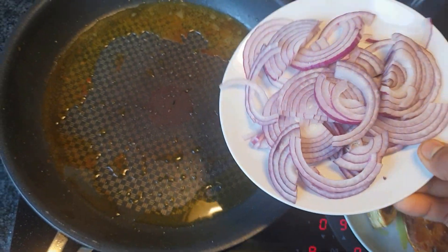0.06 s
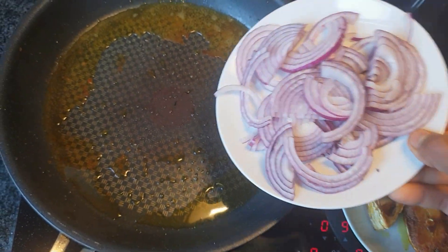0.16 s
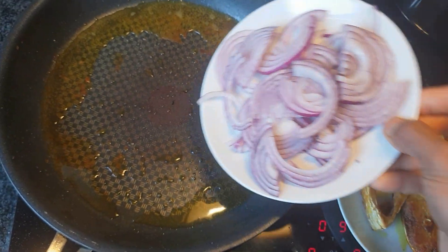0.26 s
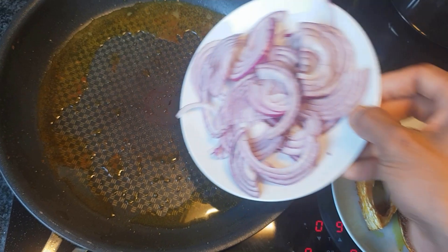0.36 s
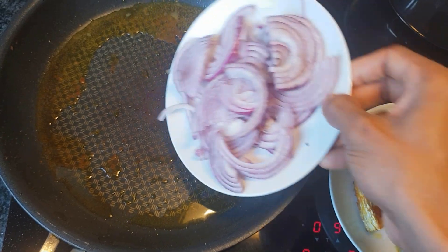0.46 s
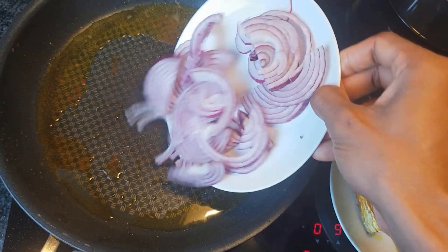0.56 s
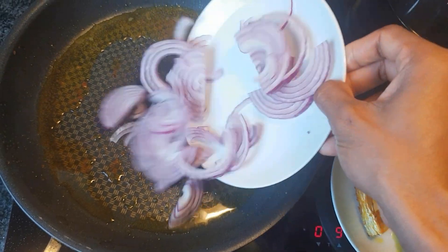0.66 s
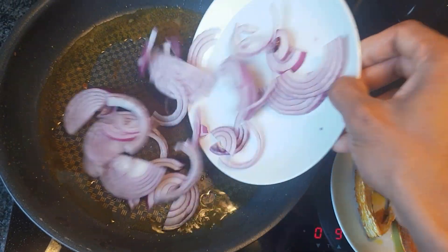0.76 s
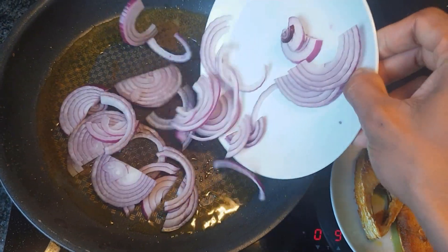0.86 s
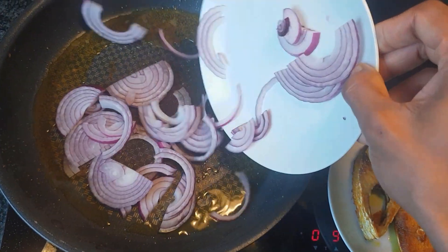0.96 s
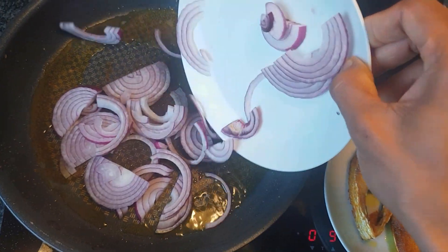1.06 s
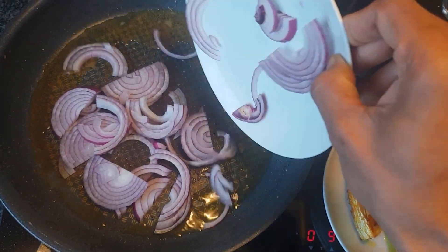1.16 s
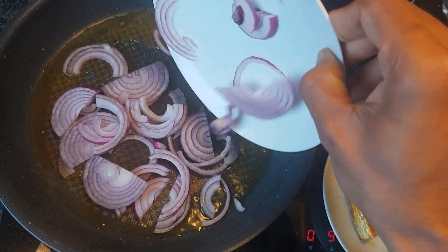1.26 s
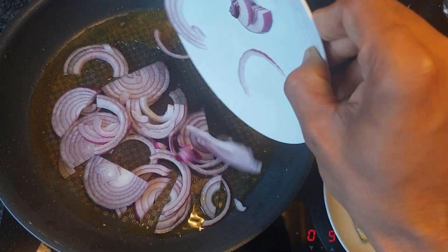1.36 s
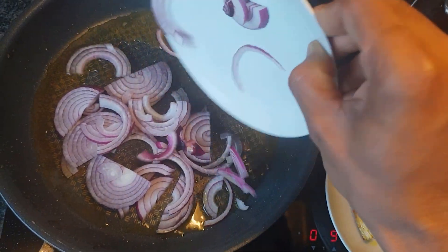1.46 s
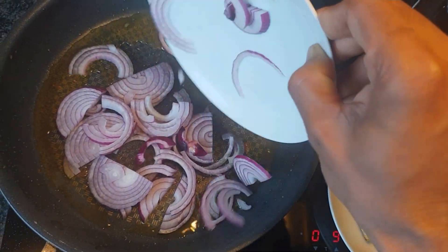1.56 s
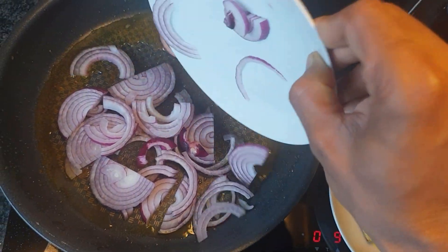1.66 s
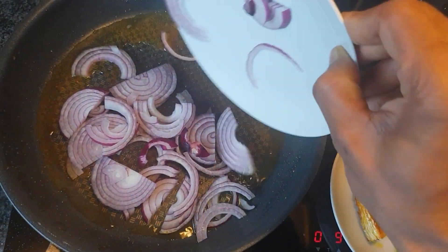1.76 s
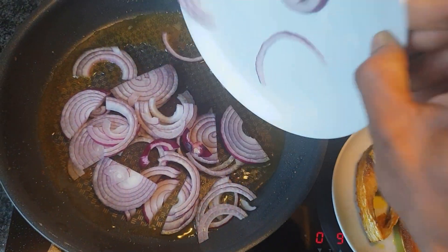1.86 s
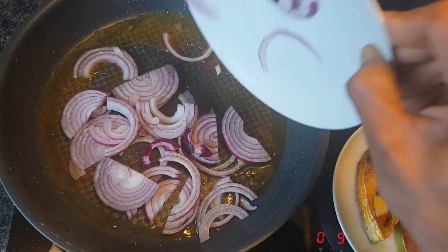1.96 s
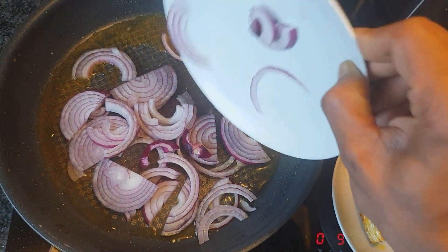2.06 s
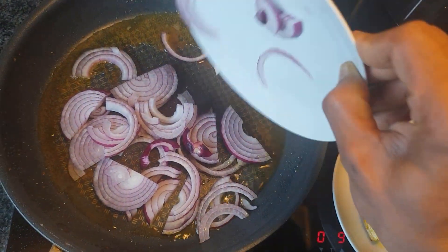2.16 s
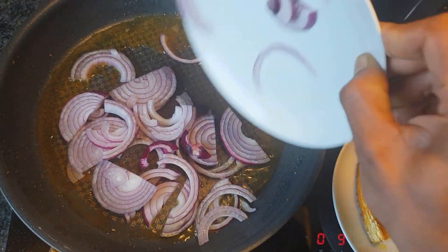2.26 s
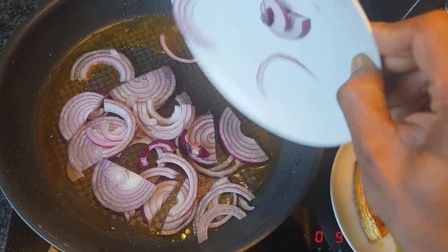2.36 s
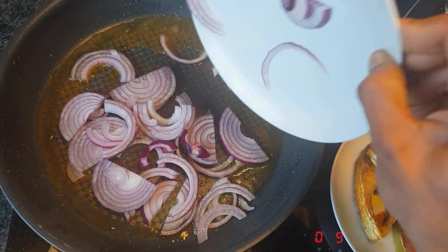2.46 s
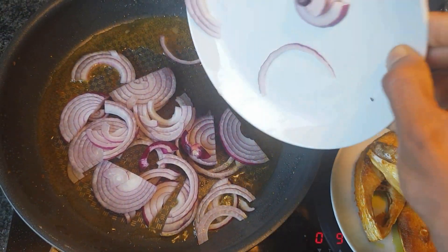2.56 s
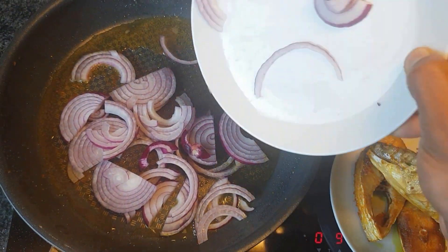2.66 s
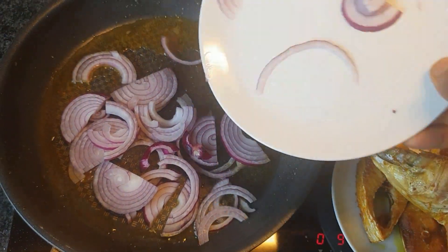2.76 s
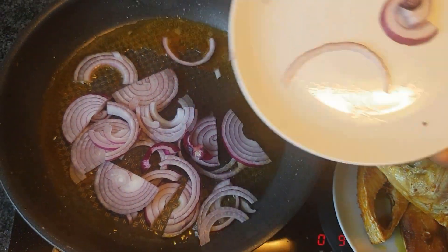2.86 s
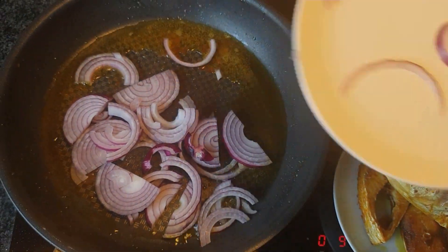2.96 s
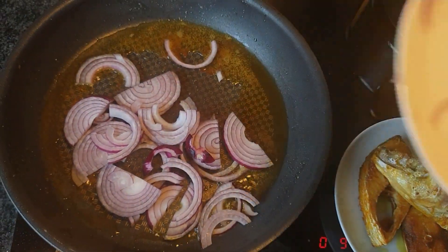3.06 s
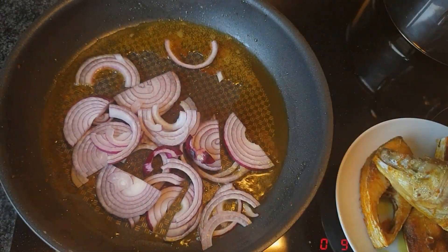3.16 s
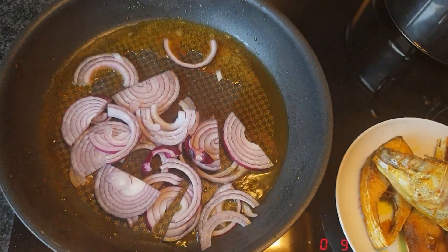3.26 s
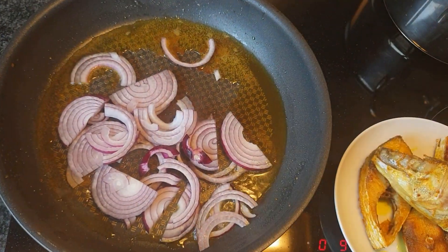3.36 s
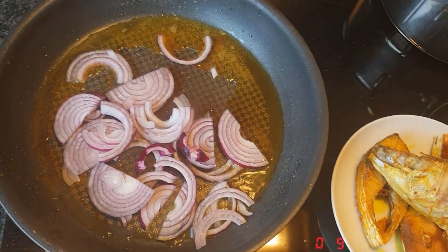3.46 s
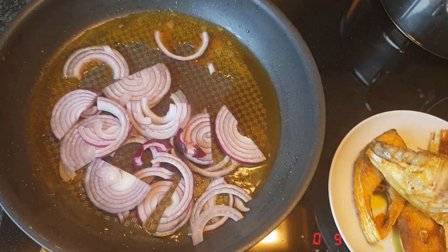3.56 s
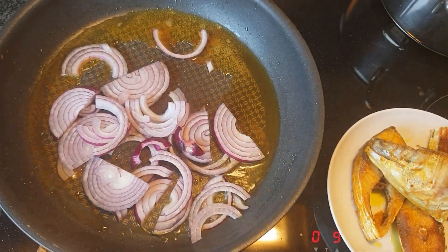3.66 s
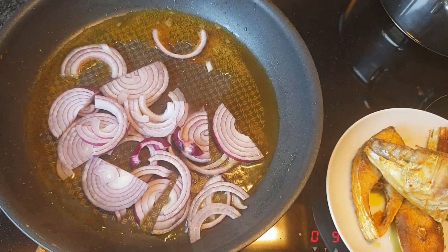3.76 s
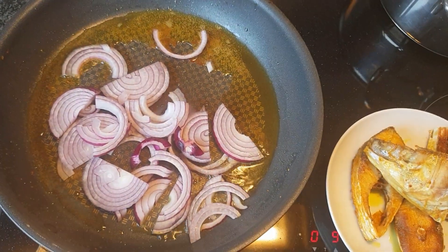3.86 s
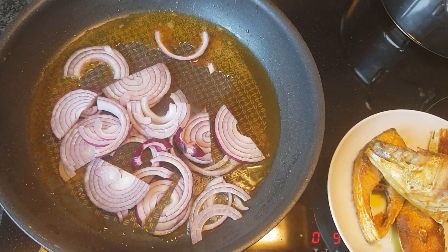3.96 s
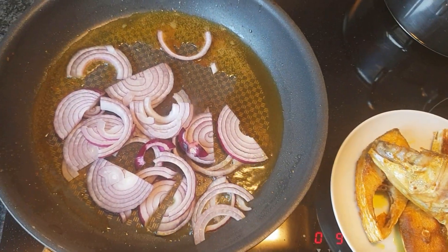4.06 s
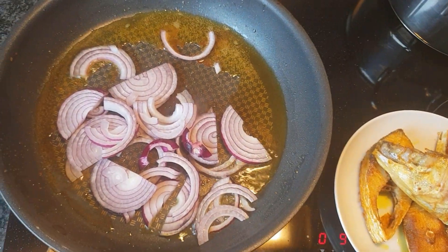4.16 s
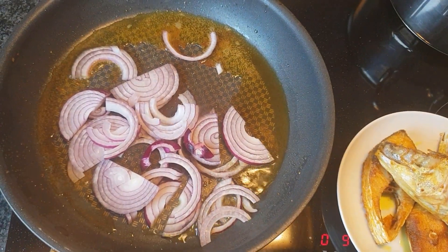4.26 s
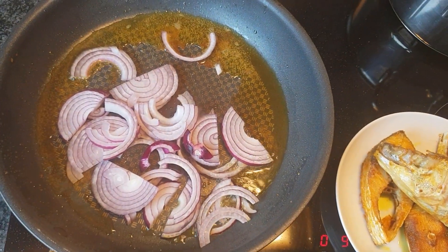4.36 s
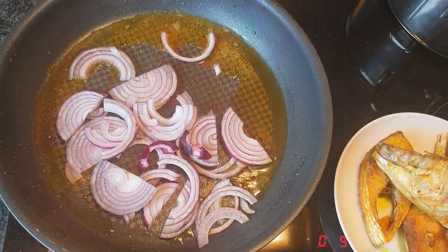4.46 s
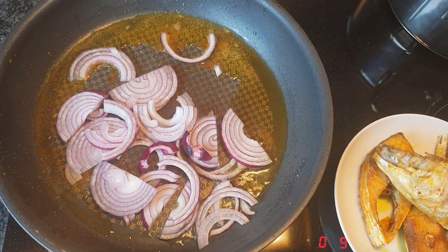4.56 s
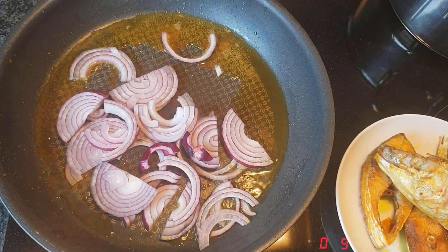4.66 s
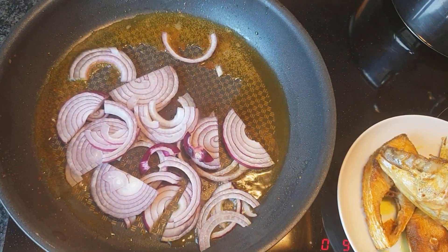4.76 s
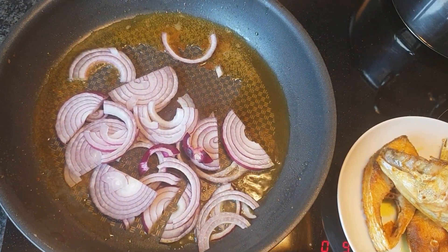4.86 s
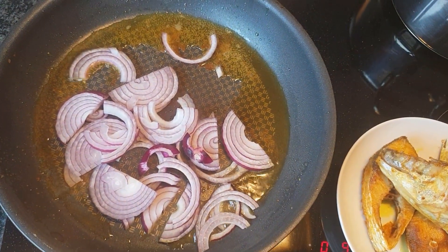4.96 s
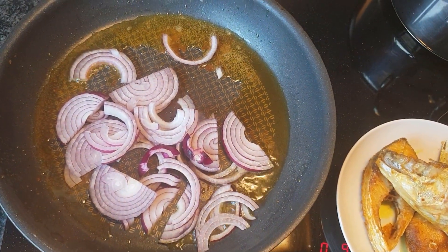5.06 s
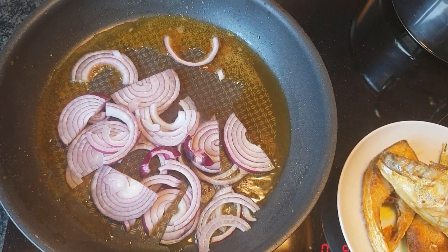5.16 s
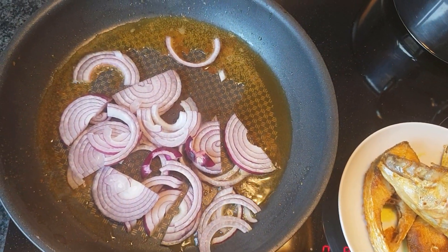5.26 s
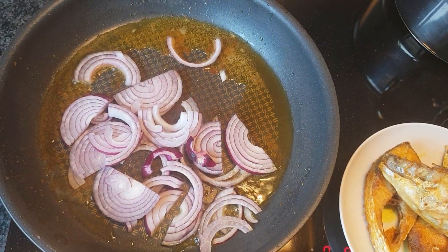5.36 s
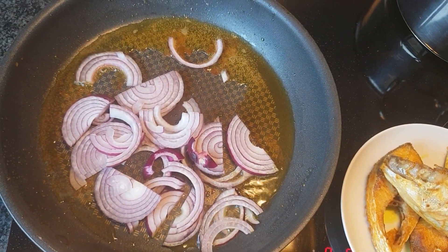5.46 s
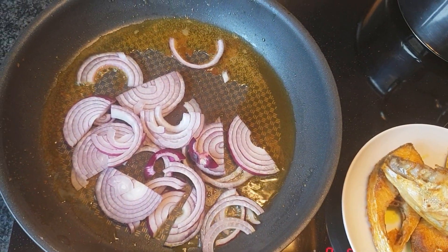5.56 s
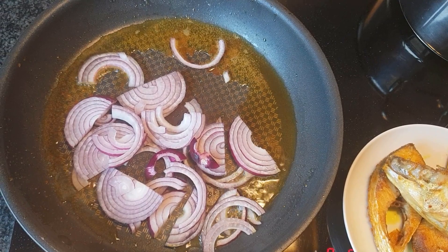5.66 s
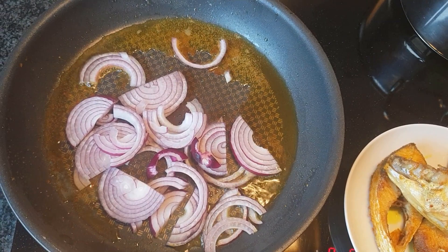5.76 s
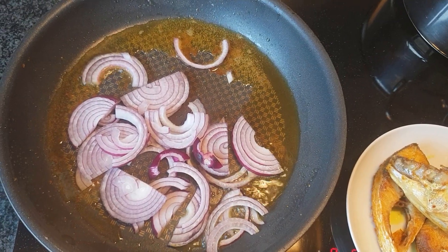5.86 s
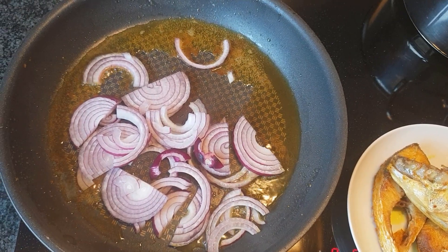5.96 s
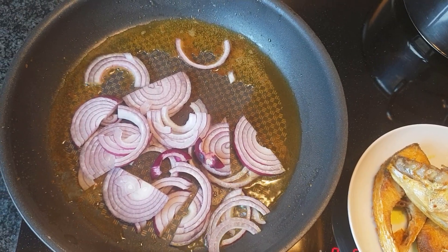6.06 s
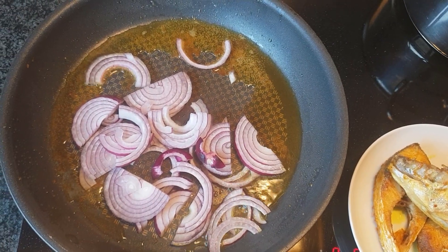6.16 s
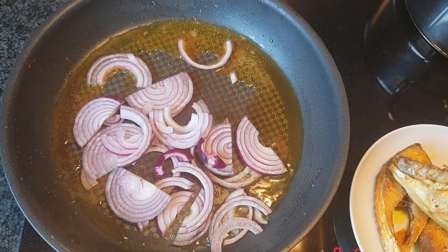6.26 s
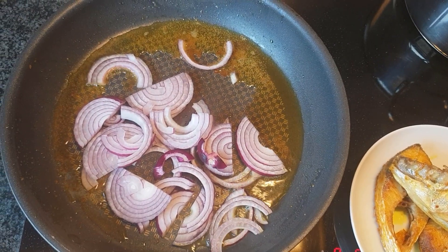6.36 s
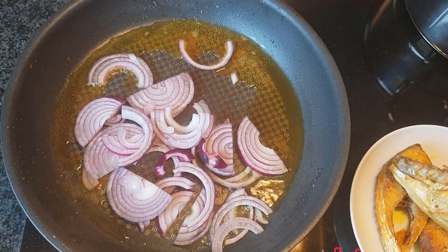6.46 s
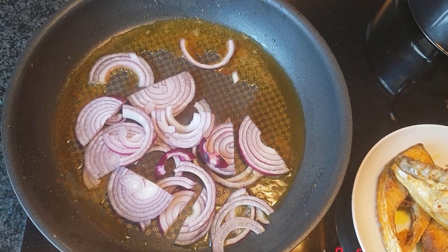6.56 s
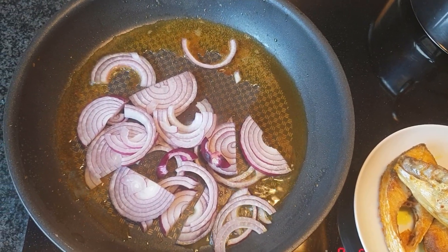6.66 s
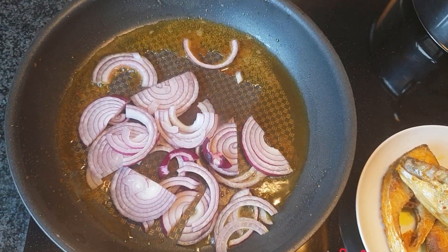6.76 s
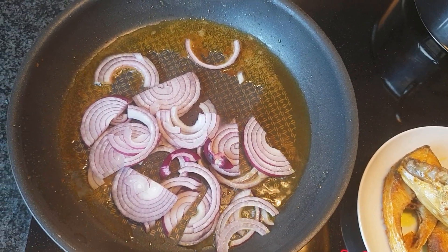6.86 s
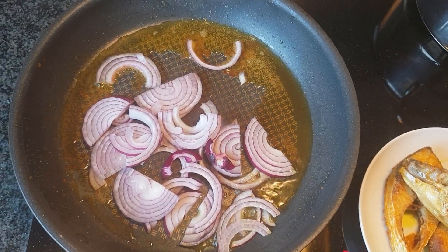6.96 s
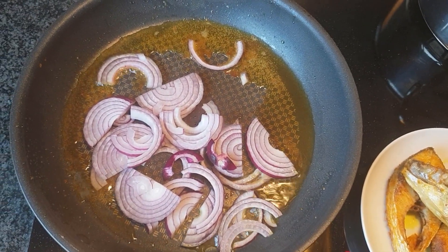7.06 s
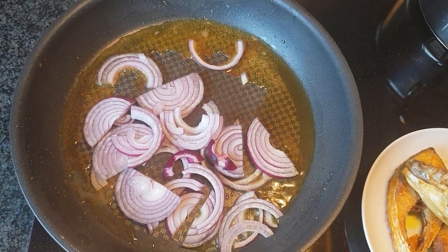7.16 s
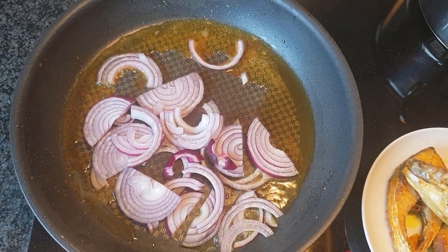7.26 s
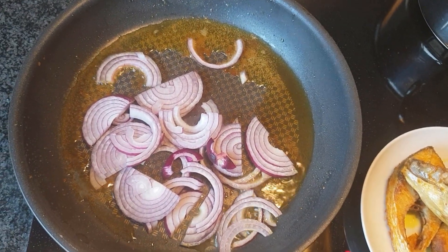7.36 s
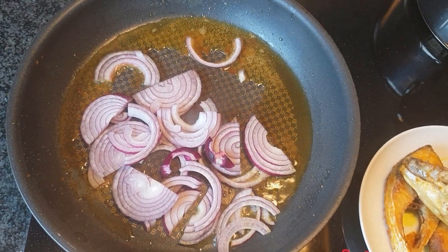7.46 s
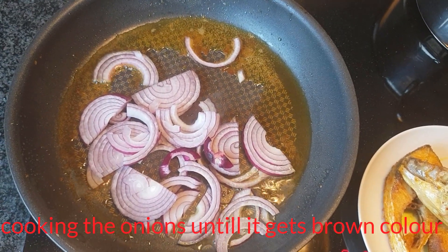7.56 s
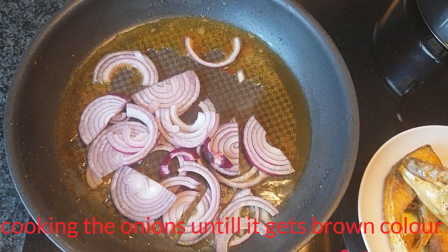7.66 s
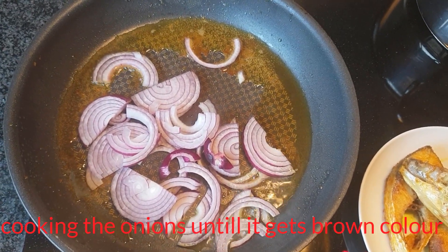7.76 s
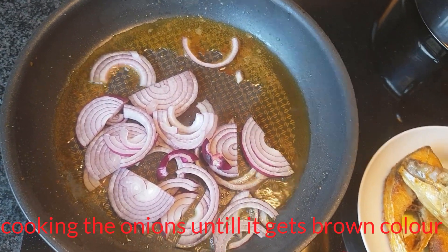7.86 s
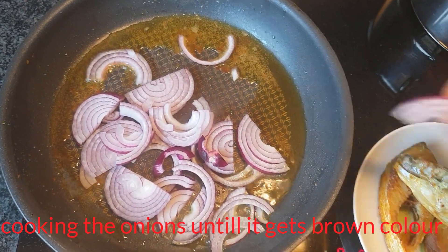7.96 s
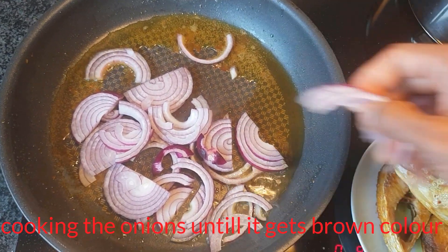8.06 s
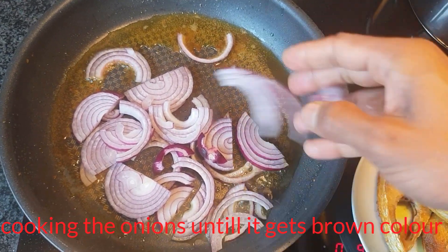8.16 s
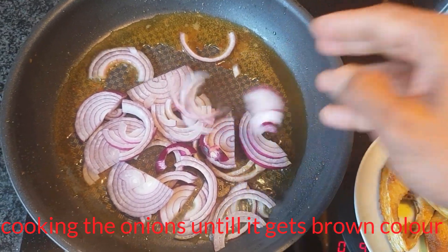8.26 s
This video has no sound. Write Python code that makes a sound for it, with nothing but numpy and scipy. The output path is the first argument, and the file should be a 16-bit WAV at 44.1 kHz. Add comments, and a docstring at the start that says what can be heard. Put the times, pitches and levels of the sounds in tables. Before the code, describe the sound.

A home kitchen heard closely in stereo, with short room reflections and a quiet fan: soft low airflow over a faint steady drone. At 0.1 and 0.2 s wet onion slices rustle faintly on a plate. From 0.65 s they drop into hot oil; dense bright sizzling leaps up within about a tenth of a second, with wet slaps until 1.25 s, strongest near 0.94, and another at 1.66. Dull rumbles from the tipped plate come around 0.8, 1.1, 1.4 and 2.3 s. The hiss stays crisp, its airy spray slowly easing. Crockery clacks and rattles sharply at 4.13, 4.36 and 4.5 s, ringing briefly, with lighter knocks at 5.0, 6.0 and 6.16. Spits snap at 5.45; from 5.8 s small crackles multiply. Boiling surges at 7.0 s, with the loudest pop at 7.08 and light knocks at 7.1 and 7.3, then spitting sizzle continues to the end.

```python
"""Sizzle of sliced onions in hot oil: dense random steam bursts ring bubble-pitched resonators.
Before it, the slices slip off a plate (shaped noise); they slap the pan, and drops of water spit as short rings.
Low rumble swells as the plate is tipped. Set down on the counter, it rattles and rings decaying modes;
lighter knocks follow. The recorder's gain control ducks loud low sound. A fan runs: noise over a drone."""
import sys
import numpy as np
from scipy import signal
from scipy.fft import rfft, irfft, next_fast_len
from scipy.io import wavfile
from scipy.ndimage import uniform_filter1d, minimum_filter1d

SR = 44100
rng = np.random.default_rng(int(sys.argv[2]) if len(sys.argv) > 2 else 0)


def unload_wav(signal):
    """Save mono or channel-first audio to the path in sys.argv[1] as 16-bit WAV at rate SR, clipped to [-1, 1]."""
    wavfile.write(
        sys.argv[1],
        SR,
        np.round(np.clip(np.atleast_2d(signal).T, -1, 1) * 32767).astype(np.int16),
    )


N = 366471
TIME_S = np.arange(N) / SR
FFT_SIZE = next_fast_len(N + SR, real=True)
FREQS_HZ = np.maximum(np.arange(FFT_SIZE // 2 + 1) * SR / FFT_SIZE, 1)

# Fan airflow spectrum: (frequency [Hz], relative gain [dB])
AIR_COLOUR = [(20, -24), (35, 0.5), (55, 3), (110, 0.5), (185, -3), (310, -0.5), (450, -3.5), (750, -6),
              (1020, -2), (1300, -8), (2400, -12.5), (3700, -9), (5500, -22), (9000, -34), (16000, -42)]
# Airflow likeness of the two sides: (frequency [Hz], correlation [0-1])
AIR_CORRELATION = [(30, 1), (150, 0.9), (300, 0.93), (600, 0.7), (1200, 0.05), (3000, 0)]
# Fan drone bands: (centre [Hz], half-width [Hz], starting RMS level [dB])
DRONE_BANDS = [(104, 10, -58.5), (132.7, 8.1, -56), (304, 25, -65), (1013, 39, -65)]
# Slices rubbing on the plate: (frequency [Hz], relative gain [dB])
RUSTLE_COLOUR = [(800, -15), (3700, 4), (7000, -2), (9000, -18), (11500, -10), (13100, 3), (15500, -19)]
# Slices slipping on the tilted plate: (time [s], relative level [dB], half length [s])
PLATE_SLIPS = [(0.1, -54.5, 0.011), (0.197, -65, 0.047)]
# Bubbling spectrum: (frequency [Hz], relative gain [dB])
BUBBLING_COLOUR = [(250, -20.5), (600, -18.5), (1300, -13.5), (2300, -11.5), (3300, -6), (4600, 1),
                   (5300, -0.7), (6100, -2.5), (7400, -1), (8500, -16), (10500, -15), (16000, -49)]
# Bubbling stereo balance: (frequency [Hz], left minus right [dB])
BUBBLING_PAN = [(500, 4.5), (2000, -1), (4200, -3.5), (6000, -0.5), (8000, -1)]
# Spray spectrum: (frequency [Hz], relative gain [dB])
SPRAY_COLOUR = [(5000, -22.5), (8000, -8), (9000, -10.5), (10300, -7.5), (11700, -2.5), (12800, -1.5),
                (14200, -3.5), (15800, -1.5)]
# Spray stereo balance: (frequency [Hz], left minus right [dB])
SPRAY_PAN = [(6000, -7.5), (8300, 1), (9800, 4.5), (11300, 3.5), (13000, -6.5), (16000, 2)]
# Boiling strength as the onions give up their water: (time [s], level change [dB])
BOIL_CURVE = [(1.2, -1.5), (1.75, 1.1), (2.6, -0.3), (4.0, 0.4), (4.8, -1), (6.3, 1.36), (7.0, 4.5),
              (7.7, 0.9), (8.3, 0.9)]
# Slices landing in the oil: (time [s], relative slap level [dB], flare size [ratio])
SLICE_LANDINGS = [(0.652, -38.5, 0.56), (0.759, -38, 1.03), (0.809, -49, .2), (0.892, -38, 0.05),
                  (0.94, -29.5, .15), (0.999, -36, .2), (1.236, -32.5, 0.05), (1.662, -40, .3)]
# Slap spectrum: (frequency [Hz], gain [dB])
SLAP_COLOUR = [(150, -22), (400, 3), (900, 16.5), (1400, 12.5), (2000, 0), (3200, -5), (8000, -27)]
# Loudest spitting drops: (time [s], relative peak [dB], pitch [Hz], crack strength [ratio])
LOUD_SPITS = [(0.653, -32, 5000, 2.4), (2.849, -22, 4650, 0.49), (5.451, -14.5, 5900, .4),
              (5.555, -26, 2150, 0.28), (6.749, -19, 5930, .6), (6.85, -13.5, 6900, .5),
              (6.896, -18, 3780, 0.33), (7.076, -6.5, 4270, 0.85), (7.128, -12, 4040, 2),
              (7.516, -18.5, 4800, .3), (7.581, -14, 6800, .15), (7.648, -19, 6800, .3),
              (7.707, -17, 4730, 0.32), (7.907, -14.5, 7000, .6), (8.035, -17, 4840, .4),
              (8.139, -17.5, 4650, 0.55)]
# Rumble as the plate is tipped and shaken: (time [s], level [dB], half length [s])
PLATE_BUMPS = [(0.8, -55.5, 0.053), (1.1, -47, 0.08), (1.43, -49, 0.07), (2.27, -53, 0.07)]
# Crockery on the counter:
# (time [s], relative strength [dB], treble lift and bass cut [dB], contact pitch [Hz], rattle length [s])
COUNTER_KNOCKS = [(4.126, -9, 2.5, 3500, .008), (4.149, -11.5, 2.5, 4070, 0.015),
                  (4.358, -16, 4, 4770, .013), (4.512, -7.5, 0, 4400, .003), (4.536, -11.5, 3, 3770, .018),
                  (5.002, -18.5, 2.5, 586, .018), (6.013, -23, 3, 493, .007), (6.16, -32, 8, 2300, 0.0059),
                  (7.117, -22.5, 0.5, 755, .015), (7.295, -33.5, 1, 1900, 0.0049)]
# Knock spectrum: (frequency [Hz], gain [dB])
KNOCK_COLOUR = [(120, -24), (230, -0.5), (340, 4), (500, 9.5), (700, 0.5), (1400, 3.5), (2100, 4.5),
                (2600, 2.5), (4100, 4), (5200, -3), (7500, -10), (10000, -15), (16000, -37)]
# Plate modes: (frequency [Hz], relative level [dB], 60 dB decay time [s])
PLATE_MODES = [(339, -37, 0.15), (465, -46, 0.22), (778, -41, 0.31), (1280, -54, 0.31), (1522, -40, 0.25),
               (1740, -47, .2), (1895, -41.5, 0.17), (2057, -44, 0.22), (2216, -43, 0.2), (3200, -49, .25),
               (4000, -53, 0.07), (4280, -46, 0.18)]

AIR_START_DB, FAN_FADE_DB_PER_S = -52.5, 0.19
CREEP_DB = -65.5   # steady rustle between slips
# Heap meets the oil; sizzle rises from FIRST_TOUCH_DB over BUILD_S
LANDING_S, BUILD_S, FIRST_TOUCH_DB = 0.647, 0.13, -21
BUBBLING_BASE_DB, SPRAY_BASE_DB = -33.5, -33
SPRAY_FOLLOWS = 0.57   # share of the boil's dB swing
FLICKER_BASE_DB, FLICKER_DB_PER_BOIL_DB = 0.8, 0.92
WET_SPRAY_DB, DRYING_S = 3.5, 1.9   # surface moisture adds spray until dried off
FLARE_DB, FLARE_PEAK_S = 1.5, 0.054   # sizzle flare for a landing of size 1
# Smaller random spits once the onions have heated through
HEATED_S, SMALL_SPITS_PER_S = 5.8, 22
SMALL_SPIT_REL_DB, SMALL_SPIT_SPREAD_DB, SMALL_SPIT_CRACK = -25, 4.5, 0.6
SMALL_SPIT_LOW_HZ, SMALL_SPIT_HIGH_HZ = 2710, 6600
BUMP_LOW_HZ, BUMP_HIGH_HZ = 65, 132
BOUNCE_LOSS_DB = 2   # per contact of a rattle
SIDES_ALIKE_BELOW_HZ = 654
# Gain control: sensing low-pass, onset, deepest cut; smoothing time constant, hold, recovery
SENSE_HZ, THRESHOLD_DB, MAX_DUCK_DB = 1970, -37, 6
DUCK_S, HOLD_S, RECOVER_DB_PER_S = 0.2, 1.01, 20
CUTOFF_HZ = 15750


def from_db(db):
    """Decibels to amplitude ratio."""
    return 10 ** (np.asarray(db) / 20)


def rms_one(x):
    """Scale to unit RMS."""
    return x / np.sqrt(np.mean(x ** 2) + 1e-20)


def at_hz(points):
    """Table interpolated on a log-frequency axis."""
    hz, value = np.transpose(points)
    return np.interp(np.log(FREQS_HZ), np.log(hz), value)


def colour(x, gain_db):
    """Causal minimum-phase filter with the given gain at each frequency."""
    cepstrum = irfft(np.log(from_db(gain_db)), FFT_SIZE)[..., :FFT_SIZE // 2]
    cepstrum[..., 0] /= 2
    response = np.exp(rfft(2 * cepstrum, FFT_SIZE))
    return irfft(rfft(x, FFT_SIZE) * response, FFT_SIZE)[..., :N]


def filtered(x, order, hz, kind="low"):
    """Butterworth filter."""
    return signal.sosfilt(signal.butter(order, hz, kind, fs=SR, output="sos"), x)


def resonant(x, hz, sharpness):
    """Resonator of Q = sharpness with unit gain at its peak."""
    return signal.lfilter(*signal.iirpeak(hz, sharpness, fs=SR), x)


def panned(difference_db):
    """Left and right dB for a left-minus-right difference."""
    return np.array([[.5], [-.5]]) * difference_db


def drift(cutoff_hz):
    """Low-passed random wander of unit RMS."""
    points_per_s = 200
    points = rng.standard_normal(int(N / SR * points_per_s) + 2)
    slow = signal.sosfilt(signal.butter(1, cutoff_hz, fs=points_per_s, output="sos"), points)
    return np.interp(TIME_S * points_per_s, np.arange(len(slow)), rms_one(slow))


def swells(rows):
    """Sum of bell-shaped gains: (time [s], level [dB], half length [s])."""
    return sum(from_db(db) * np.exp(-((TIME_S - s) / half_s) ** 2) for s, db, half_s in rows)


def tail(t60_s):
    """Dense decaying reflections of unit energy; low frequencies are nearly alike on both sides."""
    t = TIME_S[:SR // 2]
    mid, side = rng.standard_normal((2, len(t)))
    side = filtered(side, 1, SIDES_ALIKE_BELOW_HZ, "high")
    x = (mid + side * [[1], [-1]]) * from_db(-60 * t / t60_s)
    return x / np.sqrt(np.sum(x ** 2, axis=1, keepdims=True))


def path(near_db, near_t60_s, room_db, room_t60_s):
    """One spot to both ears: direct sound, near scatter, then kitchen reflections."""
    response = from_db(near_db) * tail(near_t60_s) + from_db(room_db) * tail(room_t60_s)
    response[0, 0] += 1
    response[1, rng.integers(1, 5)] += 1   # right ear 1-4 samples late
    return response / np.sqrt(np.sum(response ** 2) / 2)


def heard(x, response):
    """Sound convolved with a stereo path."""
    return signal.oaconvolve(np.atleast_2d(x), response, axes=1)[:, :N]


def add(out, s, sound):
    """Mix a sound in at time s."""
    i = int(s * SR)
    out[:, i:i + sound.shape[1]] += sound[:, :N - i]


def fan():
    """Turbulent air as part-correlated noise over a narrow-band drone, slowly fading."""
    alike = np.clip(at_hz(AIR_CORRELATION), 0, 1)
    mid, side, push = rfft(rng.standard_normal((3, FFT_SIZE)))
    stereo = np.sqrt(1 + alike) * mid + np.sqrt(1 - alike) * side * [[1], [-1]]
    air = irfft(stereo * from_db(at_hz(AIR_COLOUR)))[:, :N]
    drone = 0
    for hz, half_width_hz, db in DRONE_BANDS:
        band = irfft(push / (1 + ((FREQS_HZ - hz) / half_width_hz) ** 2))[:N]
        drone = drone + from_db(db) * rms_one(band)
    return (from_db(AIR_START_DB) * rms_one(air) + drone) * from_db(-FAN_FADE_DB_PER_S * TIME_S)


def sliding():
    """Friction of wet slices: shaped noise creeps until landing and swells at each slip."""
    level = from_db(CREEP_DB) * (TIME_S < LANDING_S) + swells(PLATE_SLIPS)
    rustle = rms_one(colour(rng.standard_normal((2, N)), at_hz(RUSTLE_COLOUR)))
    return level * rustle * from_db(panned(-5.5))


def bursts(per_s, spread_db, low_hz, high_hz, sharpness, flicker_db, count=10):
    """Uneven steam bursts; each spot has its own bubble pitch and flickers independently."""
    out = 0
    for hz in np.geomspace(low_hz, high_hz, count):
        born = np.flatnonzero(rng.random(N) < per_s / count / SR)
        size_db = spread_db * np.minimum(rng.exponential(1, len(born)), 6)
        clicks = np.zeros(N)
        clicks[born] = from_db(size_db) * rng.choice([-1, 1], len(born))
        pops = resonant(clicks + 1e-18, hz, sharpness) + 0.37 * clicks
        spot = path(near_db=6.5, near_t60_s=0.057, room_db=4.0, room_t60_s=0.39)
        out = out + heard(pops * from_db(flicker_db * drift(9.9)), spot)
    # Even out the level over 0.25 s
    return out / np.sqrt(uniform_filter1d(np.mean(out ** 2, axis=0), SR // 4) + 1e-12)


def sizzle():
    """Bubbles burst around the slices and throw up finer, brighter spray, boosted while wet."""
    boil_db = np.interp(TIME_S, *np.transpose(BOIL_CURVE))
    age_s = np.maximum(TIME_S - LANDING_S, 0)
    build = np.clip(age_s / 0.008, 0, 1) * from_db(FIRST_TOUCH_DB * np.maximum(1 - age_s / BUILD_S, 0))
    flare_db = 0
    for s, _, size in SLICE_LANDINGS:
        since = np.maximum(TIME_S - s, 0) / FLARE_PEAK_S
        flare_db = flare_db + FLARE_DB * size * since * np.exp(1 - since)

    bubbling = bursts(per_s=7000, spread_db=3.5, low_hz=1755, high_hz=8740, sharpness=2.6,
                      flicker_db=FLICKER_BASE_DB + FLICKER_DB_PER_BOIL_DB * boil_db)
    bubbling = rms_one(colour(bubbling, at_hz(BUBBLING_COLOUR) + panned(at_hz(BUBBLING_PAN))))
    bubbling = bubbling * from_db(BUBBLING_BASE_DB + boil_db)

    spray = bursts(per_s=9000, spread_db=3.5, low_hz=8260, high_hz=15900, sharpness=1.6, flicker_db=2.5)
    spray = rms_one(colour(spray, at_hz(SPRAY_COLOUR) + panned(at_hz(SPRAY_PAN))))
    wet_db = WET_SPRAY_DB * np.exp(-age_s / DRYING_S)
    spray = spray * from_db(SPRAY_BASE_DB + SPRAY_FOLLOWS * boil_db + wet_db)
    return build * from_db(flare_db + 0.44 * drift(6.7)) * (bubbling + spray)


def slices(lift_db=16):
    """Wet slices slap the pan: shaped impulses with near scatter and kitchen reflections."""
    out = np.zeros((2, N))
    for s, db, _ in SLICE_LANDINGS:
        slap = path(near_db=8, near_t60_s=0.092, room_db=6, room_t60_s=0.53)
        add(out, s, from_db(db + lift_db) * slap)
    return colour(out, at_hz(SLAP_COLOUR))


def small_spits():
    """Small drops, as LOUD_SPITS rows: random time and pitch, stronger with harder boiling."""
    chance = rng.random((100, 3))
    s = HEATED_S + (np.arange(len(chance)) + 2 * chance[:, 0]) / SMALL_SPITS_PER_S
    boil_db = np.interp(s, *np.transpose(BOIL_CURVE))
    db = SMALL_SPIT_REL_DB + boil_db + SMALL_SPIT_SPREAD_DB * (2 * chance[:, 1] - 1)
    hz = SMALL_SPIT_LOW_HZ * (SMALL_SPIT_HIGH_HZ / SMALL_SPIT_LOW_HZ) ** chance[:, 2]
    return [(*row, SMALL_SPIT_CRACK) for row in zip(s, db, hz) if row[0] < TIME_S[-1]]


def spits(sharpness=8.6, lowest_hz=2500, lift_db=4.0):
    """A drop flashes to steam: bright crack and a ring of a few cycles, too small to make bass."""
    out = np.zeros((2, N))
    click = signal.unit_impulse(SR // 50)
    for s, db, hz, crack in list(LOUD_SPITS) + small_spits():
        pop = resonant(click, hz, sharpness) + 0.25 * crack * click
        pop = filtered(pop, 2, min(lowest_hz, hz), "high")
        pop = heard(pop, path(near_db=4, near_t60_s=0.037, room_db=2, room_t60_s=0.17))
        add(out, s, from_db(db + lift_db) * pop / np.abs(pop).max())
    return out


def bumps():
    """Dull plate bumps: swells of low band-passed noise, alike on both sides."""
    rumble = filtered(rng.standard_normal(N), 2, [BUMP_LOW_HZ, BUMP_HIGH_HZ], "band")
    return swells(PLATE_BUMPS) * rms_one(rumble)


def contacts(count=3):
    """Each knock rattles with ever weaker contacts: (time [s], level [dB], treble lift [dB], pitch [Hz])."""
    rows = []
    for s, db, tilt_db, hz, rattle_s in COUNTER_KNOCKS:
        for k in range(count):
            contact_s = s + rattle_s * (k / (count - 1)) ** 1.5
            rows.append((contact_s, db - BOUNCE_LOSS_DB * k, tilt_db, hz))
    return rows


def ring(x, hz, t60_s):
    """Decaying mode: a unit click starts a sine of initial height 1."""
    r, w = from_db(-60 / (t60_s * SR)), 2 * np.pi * hz / SR
    return signal.lfilter([0, np.sin(w)], [1, -2 * r * np.cos(w), r * r], x + 1e-18)


def crockery(lift_db=18, ring_db=-10, split_hz=1400, clack_db=1, sharpness=7, crack_db=-1, crack_hz=3000):
    """Contacts crack, clack at their pitch, thud on the counter, ring the plate and fill the kitchen."""
    out = np.zeros((2, N))
    for s, db, tilt_db, hz in contacts():
        blow = path(near_db=11.5, near_t60_s=0.091, room_db=10.5, room_t60_s=0.49)
        blow = blow + from_db(clack_db) * resonant(blow, hz, sharpness)
        low = filtered(blow, 1, split_hz)
        crack = filtered(tail(0.0097), 2, crack_hz, "high")
        high = blow - low + from_db(crack_db) * crack
        add(out, s, from_db(db + lift_db) * (low * from_db(-tilt_db) + high * from_db(tilt_db)))
    rings = sum(from_db(db + ring_db) * ring(out, hz, t60_s) for hz, db, t60_s in PLATE_MODES)
    return colour(out + rings, at_hz(KNOCK_COLOUR)) * from_db(panned(-1.1))


def gain_control(x):
    """Low-band level above threshold turns the gain down; the cut is held, then recovers."""
    sensed = filtered(x.mean(axis=0), 4, SENSE_HZ)
    level_db = 10 * np.log10(np.abs(uniform_filter1d(sensed ** 2, SR // 50)) + 1e-12)
    over_db = np.clip(level_db - THRESHOLD_DB, 0, MAX_DUCK_DB)
    # Running maximum over the past HOLD_S
    half_hold = int(HOLD_S * SR / 2)
    held_db = -minimum_filter1d(-over_db, 2 * half_hold + 1, origin=half_hold, mode="constant")
    recovery_db = RECOVER_DB_PER_S * TIME_S
    cut_db = np.maximum.accumulate(held_db + recovery_db) - recovery_db
    # Smooth the onset only
    r = np.exp(-1 / (DUCK_S * SR))
    smooth_db = signal.lfilter([1 - r], [1, -r], cut_db)
    return x * from_db(-np.minimum(smooth_db, cut_db))


def scene():
    """Pan, plate, counter and fan together."""
    return fan() + sliding() + sizzle() + slices() + spits() + bumps() + crockery()


def record(dry):
    """Gain control, then a steep low-pass."""
    top_cut = signal.ellip(12, .1, 80, CUTOFF_HZ, fs=SR, output="sos")
    return signal.sosfilt(top_cut, gain_control(dry))


dry = scene()
out = record(dry)
unload_wav(out)
```